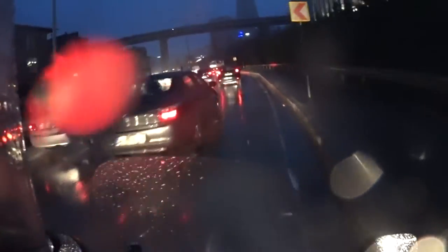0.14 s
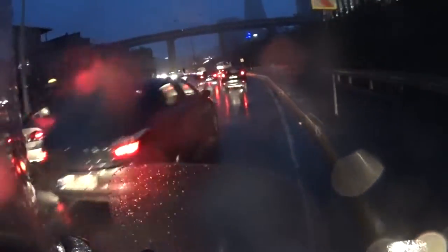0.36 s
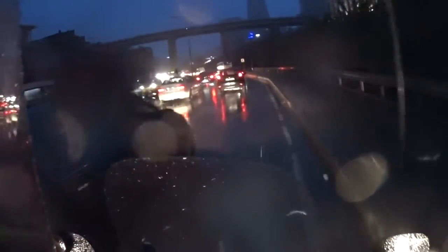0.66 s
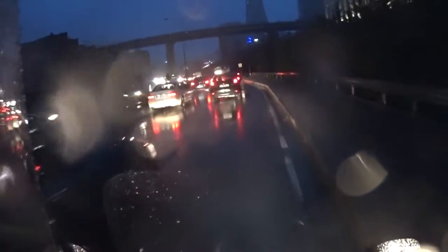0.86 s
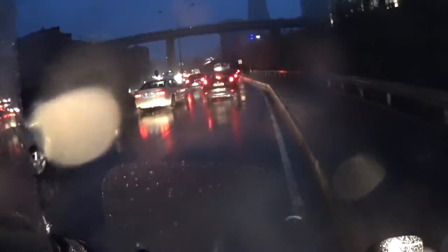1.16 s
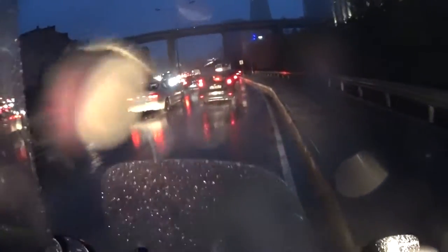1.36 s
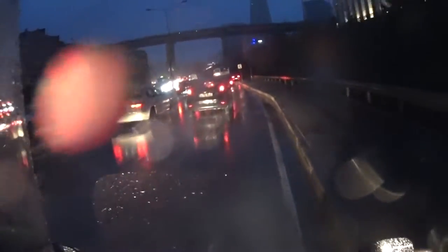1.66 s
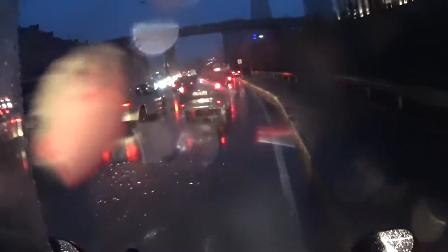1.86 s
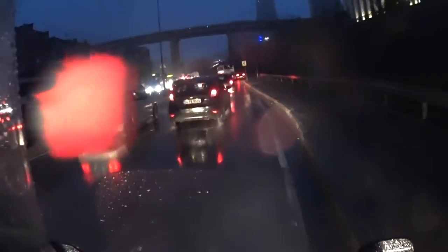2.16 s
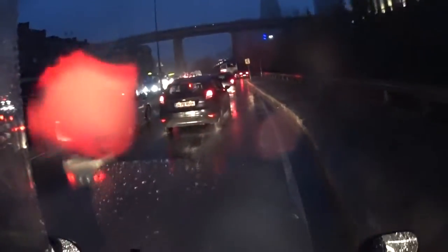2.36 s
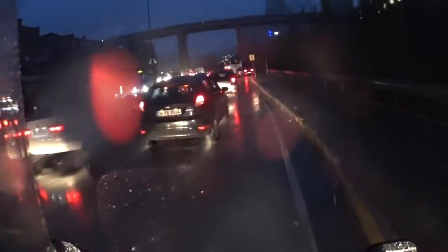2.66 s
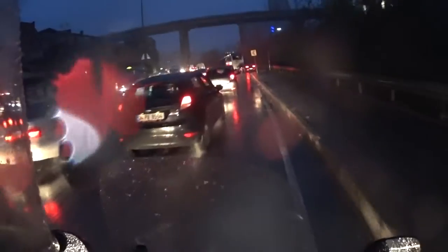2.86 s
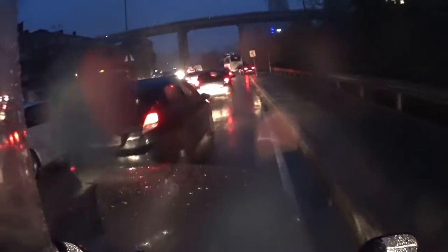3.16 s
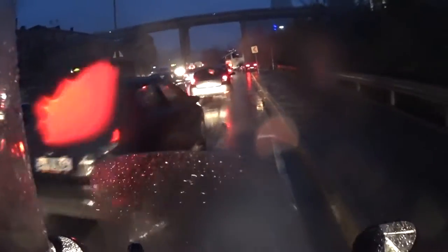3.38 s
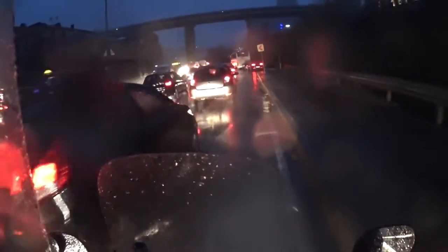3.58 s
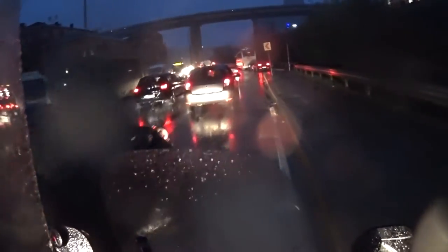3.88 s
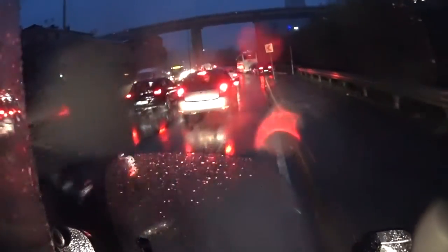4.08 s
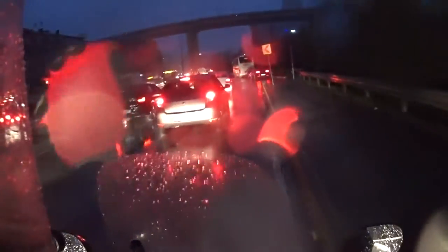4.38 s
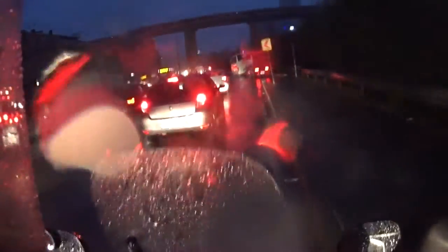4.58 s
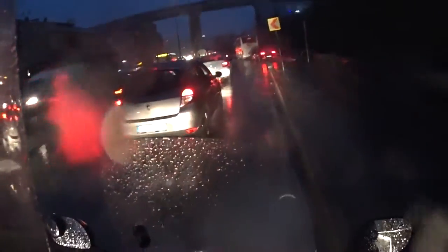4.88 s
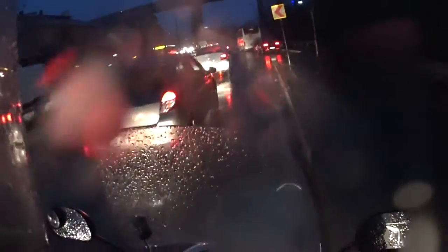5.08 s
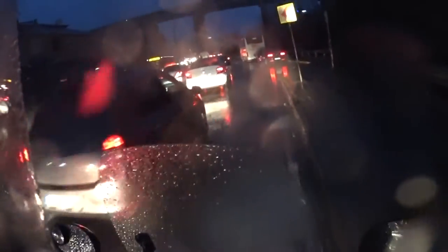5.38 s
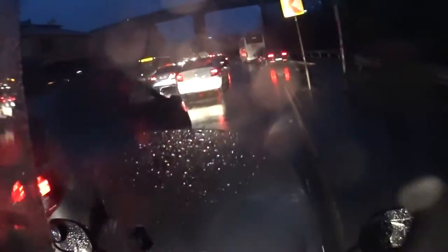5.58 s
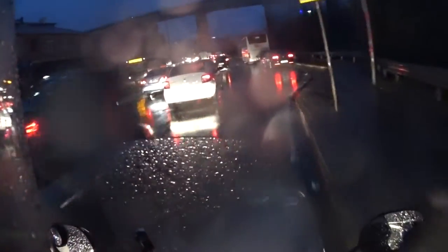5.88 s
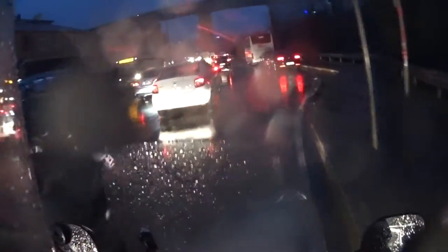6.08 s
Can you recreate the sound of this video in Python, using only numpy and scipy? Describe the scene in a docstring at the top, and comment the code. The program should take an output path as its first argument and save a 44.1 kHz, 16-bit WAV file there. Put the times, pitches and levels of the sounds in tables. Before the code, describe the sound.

Close to the microphone, rain raps on a thin plastic housing outdoors: sharp knocks, dull wet plinks, tiny ticks and bursts of patter, irregular and thick. Behind it runs the hissing, hollow wash of a wet road with a faint singing tone. After almost four seconds the big drops grow sparser and a weak engine hum emerges; the wash swells again near the end.

```python
"""Rain strikes the plastic housing of a camera on a scooter that rides along a wet road.
Drops fall thickly at first: large ones ring the housing, duller ones plink close by, specks tick, spray patters.
The road's wash passes the same shell, whose air cavity sings near 1 kHz; it swells near 0.9 s.
After about 3.7 s the large drops thin out and a faint engine hum rises below; the wash swells again near 6 s.
Struck modes make drops, specks and spray; short notes the plinks; shaped noise the wash; sines the hum."""
import sys
import numpy as np
from scipy import signal
from scipy.io import wavfile
from scipy.ndimage import uniform_filter1d

SR = 44100
rng = np.random.default_rng(int(sys.argv[2]) if len(sys.argv) > 2 else 0)


def store_pcm(level_fs):
    """Save levels as 16-bit WAV."""
    pcm = np.round(np.clip(level_fs, -1, 1) * 32767).astype(np.int16)
    wavfile.write(sys.argv[1], SR, np.atleast_2d(pcm).T)


N = 275184


def gain_of(db):
    """dB to amplitude gain."""
    return 10 ** (np.asarray(db) / 20)


def evened(x):
    """Scales to rms 1."""
    return x / np.sqrt(np.mean(x ** 2) + 1e-20)


def slow_noise(shape, size):
    """Noise of rms 1, smoothed twice over `size` samples."""
    smooth = uniform_filter1d(rng.standard_normal(shape), size=size)
    return evened(uniform_filter1d(smooth, size=size))


def read(points, hz):
    """Reads a spectrum on a log-frequency axis."""
    point_hz, value = np.transpose(points)
    return np.interp(np.log(hz + 1), np.log(point_hz + 1), value)


def place(times_s, hits):
    """Adds each stereo hit at its time."""
    out = np.zeros((2, N + SR))
    for time_s, hit in zip(times_s, hits):
        at = round(time_s * SR)
        out[:, at:at + hit.shape[1]] += hit
    return out[:, :N]


# engine: (time [s], firing rate [Hz], level [dB], boost of multiples above 2 [dB])
ENGINE = [(3.7, 182, -85, 0), (3.88, 183, -69.5, -1), (4.3, 189, -70.5, 3), (4.45, 189, -76, 4),
          (4.75, 190, -71, 0), (5.1, 184, -76, 4), (5.35, 183, -75, 7), (5.8, 187, -73, 3),
          (6.24, 199, -71, 1)]
# engine tones: (multiple of firing rate, relative level [dB])
ENGINE_ORDERS = [(2, 3), (3.1, 2.5), (4.02, -6)]


def hum(waver=0.009, flutter_db=2.5):
    """Sines at multiples of the firing rate waver together in pitch; each flutters in level."""
    time_s, firing_hz, level_db, upper_db = np.transpose(ENGINE)
    t = np.arange(N) / SR
    wobble, *flutters = slow_noise((1 + len(ENGINE_ORDERS), N), size=3000)
    turns = np.cumsum(np.interp(t, time_s, firing_hz) * (1 + waver * wobble)) / SR
    boost_db = np.interp(t, time_s, upper_db)
    tones = 0
    for (multiple, part_db), flutter in zip(ENGINE_ORDERS, flutters):
        tone_db = part_db + (multiple > 2) * boost_db + flutter_db * flutter
        tones = tones + gain_of(tone_db) * np.sin(2 * np.pi * (multiple * turns + rng.random()))
    return np.sqrt(2) * gain_of(np.interp(t, time_s, level_db)) * tones


# rain, also for spray and plinks: (time [s], road wash level [dB], shell spray level [dB], patter level [dB])
RAIN_LEVELS = [(0, -36.5, -49, -52), (.29, -39.5, -40.5, -62), (.5, -38.5, -48, -38.5),
               (.69, -37.5, -47, -51), (.92, -33.5, -43, -48), (1.1, -35, -47, -42.5),
               (1.2, -40, -49.5, -46), (1.65, -39.5, -43, -43), (1.78, -39, -43.5, -38.5),
               (1.95, -42, -44.5, -54), (2.15, -38.5, -43.5, -35.5), (2.28, -40.5, -45.5, -51),
               (2.45, -37, -40, -37.5), (2.62, -42.5, -48, -56), (2.87, -37.5, -44, -54),
               (3.1, -41, -52, -47.5), (3.5, -37.5, -53, -47.5), (3.8, -43.5, -47, -45),
               (4.03, -41, -55, -62), (4.55, -40, -51.5, -50), (5.0, -42.5, -49, -51.5),
               (5.65, -42.5, -54, -52.5), (5.9, -40.5, -59, -47), (6.05, -35.5, -53, -47),
               (6.24, -40, -45.5, -51)]
# road rumble: (time [s], level on the wash scale [dB])
RUMBLE_LEVELS = [(0, -36), (.8, -36.5), (1.2, -39.5), (1.6, -39.5), (1.9, -39), (2.35, -38), (2.52, -42.5),
                 (2.75, -44), (2.95, -38.5), (3.1, -44), (3.5, -42.5), (4.2, -46.5), (5.3, -46.5),
                 (6.24, -40)]
# wash heard through the housing: (frequency [Hz], relative density [dB per Hz])
WASH_SPECTRUM = [(30, -37), (368, -14), (500, -14), (880, -7.5), (1180, -13), (1550, -3), (2350, -9.5),
                 (2900, -7), (3600, -15), (3900, -17), (4500, -13.5), (4900, -19), (5600, -18.5),
                 (6900, -28), (9000, -33), (10800, -33.5), (14500, -47.5), (16500, -55)]
# left-right likeness of the wash: (frequency [Hz], correlation [-1 to 1])
WASH_LIKENESS = [(60, 0.87), (150, 0.99), (380, 0.91), (950, 0.93), (2380, 0.55), (5980, 0.68),
                 (15000, 0.27)]
# stereo lean of the wash: (frequency [Hz], left minus right [dB])
WASH_LEAN = [(60, 0.0), (150, 0.0), (380, 0.5), (950, 3.0), (2380, 0.5), (5980, -0.5), (15000, 0.0)]
CAVITY_HZ, CAVITY_WIDTH_HZ, CAVITY_DB = 1000, 66, 0.0  # air behind the ports


def wash(patchy_db=1.5, split_hz=1600.0):
    """Tyre wash and far rain as patchy noise through the cavity; rumble under the split swells on its own."""
    frames, hz = N // 512 + 5, np.fft.rfftfreq(2048, 1 / SR)
    a, b, c, d, patches = rng.standard_normal((frames, 1025, 5)).T
    patches = evened(uniform_filter1d(uniform_filter1d(patches, size=12, axis=0), size=5, axis=1))

    time_s, wash_db, *_ = np.transpose(RAIN_LEVELS)
    t = np.arange(frames) * 512 / SR
    low = 1 / (1 + (hz[:, None] / split_hz) ** 4)
    swell_db = low * np.interp(t, *np.transpose(RUMBLE_LEVELS)) + (1 - low) * np.interp(t, time_s, wash_db)

    same = np.clip(read(WASH_LIKENESS, hz), -1, 1)[:, None]
    lean = gain_of(read(WASH_LEAN, hz) / 2)[:, None]
    left, other = a + 1j * b, c + 1j * d
    right = same * left + np.sqrt(1 - same ** 2) * other
    stereo = np.array([lean * left, right / lean])

    # the cavity tone wavers at random in pitch and level
    drift, flutter = evened(uniform_filter1d(rng.standard_normal((2, frames)), size=5))
    offset_hz = hz[:, None] - CAVITY_HZ * (1 + .009 * drift)
    cavity = gain_of(CAVITY_DB + 2.5 * flutter) / (1 + (2 * offset_hz / CAVITY_WIDTH_HZ) ** 2)
    colour = gain_of(read(WASH_SPECTRUM, hz))[:, None] + cavity

    unit = np.sqrt(np.mean(signal.istft(left * colour, nperseg=2048, noverlap=1536)[1] ** 2))
    stereo = stereo * colour * gain_of(swell_db + patchy_db * patches) / unit
    return signal.istft(stereo, nperseg=2048, noverlap=1536)[1][:, :N]


# housing modes: (centre frequency [Hz], relative level before scatter [dB], t60 [s])
HOUSING_MODES = [(750, 13, 0.0059), (998.6, 5.5, 0.11), (1453, 22, 0.013), (1954, 12.5, 0.038),
                 (2295, -2, 0.016), (2656, 5.5, 0.0062), (2901, 3, 0.019), (3358, 6, 0.0094),
                 (3837, 2, 0.014), (4185, -4, 0.017), (5113, 4, 0.0032), (5500, 6.5, 0.0026),
                 (6270, -2.5, 0.0029), (7570, 0, 0.0014), (9070, -2.5, 0.00079), (10500, -13, 0.0049),
                 (12160, -16, 0.0011), (13300, -19, 0.0031), (15200, -26, .003)]
KNOCK, RING = HOUSING_MODES[:4], HOUSING_MODES[4:10]
SNAP, TICK = HOUSING_MODES[10:13], HOUSING_MODES[13:]
# shell, stiff below and sealed above: (edge [Hz], filter order, filter kind)
SHELL_FILTERS = [(700, 2, "highpass"), (11500, 3, "lowpass")]


def strikes(modes, count, splash_s, apart, tilt_db=0):
    """Stereo strikes (count, 2, time), mono rms 1 over 5 ms: a splash rings modes that differ by spot."""
    t = np.arange(900) / SR
    level_chance, pitch_chance = np.moveaxis(rng.standard_normal((count, len(modes), 2, 1)), 2, 0)
    hz, db, t60_s = np.array(modes).T[..., None]
    sign = (-1.) ** np.arange(len(modes))[:, None]
    mode_db = db + tilt_db * np.log2(hz / hz.mean()) + 3 * level_chance - 60 * t / t60_s
    rings = sign * gain_of(mode_db) * np.sin(2 * np.pi * hz * (1 + .035 * pitch_chance) * t)
    rings = rings.sum(1)
    # the last filter thins out what lies under the lowest mode
    for edge_hz, order, kind in SHELL_FILTERS + [(.8 * hz.min(), 2, "highpass")]:
        rings = signal.sosfilt(signal.butter(order, edge_hz, kind, fs=SR, output="sos"), rings)

    fade = np.exp(-t[:300] / splash_s)  # the water spreads after a sharp contact
    both, left, right = np.moveaxis(rng.standard_normal((count, 3, len(fade))) * fade, 1, 0)
    both = both + 5.04 * np.exp(-t[:300] / .00004)
    splash = np.stack([both + apart * left, both + apart * right], 1)  # the ports share part of the blow
    out = signal.fftconvolve(splash, rings[:, None], axes=2)
    return out * np.sqrt(SR / 200 / (out.mean(1) ** 2).sum(1))[:, None, None]


def rain_gain(column):
    """Gain over time from one level column of the rain table."""
    rain = np.transpose(RAIN_LEVELS)
    return gain_of(np.interp(np.arange(N) / SR, rain[0], rain[column]))


def random_drops(per_s, spread_db, most, gust_db, gust_size):
    """Impulses at random times, a few larger than most, their sizes swayed in short flurries."""
    size = gain_of(spread_db * np.minimum(rng.exponential(1, N), most)) * (rng.random(N) < per_s / SR)
    return size * gain_of(gust_db * slow_noise(N, gust_size))


def spray(per_s=800., spread_db=6.5, gust_db=7.5):
    """Small drops land at random on 24 spots and ring the housing modes."""
    spots = gain_of(-1.5) * strikes(KNOCK, count=24, splash_s=0.00095, apart=0.079)
    spots = spots + strikes(RING, count=24, splash_s=0.00072, apart=0.068)
    spots = spots + gain_of(-3.0) * strikes(SNAP + TICK, count=24, splash_s=0.0006, apart=1.2)
    size = random_drops(per_s, spread_db, 2.6, gust_db, gust_size=1500)
    spot = rng.integers(0, len(spots), N)
    out = 0
    for k, tap in enumerate(spots):
        out = out + signal.oaconvolve((size * (spot == k))[None], tap, axes=1)[:, :N]
    return evened(out) * rain_gain(column=2)


PATTER_RISE_S, CLEAR_RISE_S = 0.0022, 0.001117
PATTER_HZ, PATTER_SPREAD = 2272, 0.237  # median pitch and its log scatter
PLINK_SAG = 0.046  # fall in pitch, as a fraction


def plink(hz, rise_s=PATTER_RISE_S, rough=0.56, second_db=-7.0):
    """A soft, wet, uneven note: two tones of one pitch swell for rise_s, sag in pitch and die."""
    u = np.arange(600) / SR / rise_s
    turns = np.cumsum(hz * (1 + PLINK_SAG * (np.exp(-u / 2) - .5))) / SR
    wobble = 1 + rough * slow_noise(len(u), size=40)
    note = np.sin(2 * np.pi * (turns + rng.random()))
    note = note + gain_of(second_db) * np.sin(2 * np.pi * (turns + rng.random()))
    return np.sqrt(2) * u * np.exp(1 - u) * wobble * note


# dull drops on something soft close by: (time of peak [s], nominal rms level at peak [dB], pitch [Hz])
CLEAR_PLINKS = [(0.124, -33, 1870), (0.427, -32.5, 2240), (0.773, -37, 1880), (1.2501, -35, 2010),
                (1.2988, -29.5, 1800), (1.402, -25, 2070), (1.7158, -34, 1940), (1.81, -29, 2010),
                (2.1865, -32, 2370), (2.2688, -30, 2060), (2.5504, -34, 2190), (2.5785, -31, 2020),
                (2.6701, -35, 1930), (2.7651, -30, 2050), (2.8241, -28.5, 2230), (2.9423, -34, 1900),
                (3.1349, -36, 1980), (3.942, -32.5, 2030), (4.2472, -25, 2060), (4.529, -31, 1970),
                (4.562, -33, 2010), (4.7947, -34, 2040), (4.842, -34, 1960), (5.2733, -37.5, 2050),
                (5.6185, -25.5, 1880), (5.7994, -37, 1650), (5.818, -32, 1780), (6.1799, -32, 1950)]


def plinks(per_s=1300., spread_db=3.0, gust_db=2.2, lean_db=4.5):
    """Clear soft notes over a random patter of small ones from 16 spots, each leaning left or right."""
    size = random_drops(per_s, spread_db, 3, gust_db, gust_size=2000)
    spot, chance = rng.integers(0, 16, N), rng.standard_normal((16, 2))
    patter = 0
    for k, (pitch, side) in enumerate(chance):
        note = plink(PATTER_HZ * np.exp(PATTER_SPREAD * pitch))
        lean = gain_of(lean_db * side * np.array([[.5], [-.5]]))
        patter = patter + lean * signal.oaconvolve(size * (spot == k), note)[:N]
    out = evened(patter) * rain_gain(column=3)
    for peak_s, level_db, hz in CLEAR_PLINKS:
        part = out[:, round((peak_s - CLEAR_RISE_S) * SR):][:, :600]
        part += gain_of(level_db) * plink(hz, CLEAR_RISE_S)[:part.shape[1]]
    return out


# clear specks of spray: (time [s], peak level of the treble [dB])
SPRAY_SPECKS = [(.0167, -28), (.1017, -28), (.1164, -31), (.1384, -37), (0.159, -31), (0.2553, -30),
                (.3541, -35), (.38, -36), (.4044, -30), (.6367, -34), (.6586, -30), (.757, -35), (.77, -35),
                (.7866, -29), (.832, -39), (.8945, -34), (0.911, -32), (.9438, -28), (.961, -32),
                (1.0244, -38), (1.1093, -32), (1.191, -35), (1.235, -29), (1.343, -36), (1.4296, -35),
                (1.482, -30), (1.5723, -35), (1.6205, -27), (1.64, -33), (1.6665, -33), (1.699, -27),
                (1.795, -30), (1.844, -33), (2.0686, -30), (2.1435, -38), (2.1798, -33), (2.2388, -36),
                (2.289, -37), (2.4304, -37), (2.4384, -34), (2.4664, -36), (2.497, -30), (2.5047, -35),
                (2.524, -34), (2.5398, -37), (2.6191, -34), (2.796, -35), (2.814, -31), (2.858, -37),
                (2.9664, -31), (3.024, -35), (3.1397, -31), (3.213, -31), (3.32, -28), (3.329, -31),
                (3.401, -30), (3.4647, -29), (3.6004, -35), (3.9994, -32), (4.073, -30), (4.0978, -30),
                (4.103, -30), (4.441, -29.5), (4.4474, -31), (4.675, -34), (4.775, -32.5), (4.8513, -35),
                (5.023, -37.5), (5.2084, -30), (5.257, -30), (5.347, -36), (5.43, -34), (5.717, -31),
                (5.976, -32), (6.0072, -32), (6.0611, -30), (6.0973, -32), (6.161, -30)]


def specks(ring_db=0.0):
    """Each speck ticks the high modes and rings the middle ones; ring_db is ring over tick."""
    treble = strikes(SNAP + TICK, count=len(SPRAY_SPECKS), splash_s=0.0005, apart=1.0)
    ring = strikes(RING, count=len(SPRAY_SPECKS), splash_s=0.0019, apart=0.36)
    hits = treble + gain_of(ring_db) * ring
    time_s, level_db = np.transpose(SPRAY_SPECKS)
    treble_peak = abs(treble.mean(1)).max(1)
    return place(time_s, (gain_of(level_db) / treble_peak)[:, None, None] * hits)


# large drops, levels rms over 5 ms: (time [s], knock [dB], ring [dB], snap [dB], tick [dB])
LARGE_DROPS = [(0.0068, -34, -46, -52, -47), (0.0296, -49, -26.5, -32.5, -38), (0.0533, -35, -42, -35, -34),
               (0.1068, -36, -30, -30.5, -29), (0.2511, -36, -41, -39, -39), (0.2617, -36, -38, -38, -39.5),
               (0.2762, -37, -37, -44, -49), (0.33, -43, -37, -40, -39), (0.3996, -32.5, -23.5, -28, -37),
               (0.4387, -55, -41, -43, -47), (0.4764, -32, -30, -34, -42), (0.4895, -41, -28, -33, -47),
               (0.494, -47, -35, -36, -45), (0.497, -29, -22.5, -31, -33.5), (0.5601, -41, -28.5, -35, -43),
               (0.569, -50, -39, -42, -47), (0.5722, -31, -23.5, -29, -35), (0.5825, -33, -24, -27, -37),
               (0.6052, -39, -29, -32, -43), (0.627, -50, -47, -35, -41), (0.65, -56, -22.5, -29, -40),
               (0.683, -38, -30, -31, -30), (0.6887, -36, -31, -29, -40), (0.6988, -31, -27, -28, -48),
               (0.7016, -43, -42, -42, -39), (0.7404, -52, -35, -41, -39.5), (0.7947, -36, -25.5, -44, -40),
               (0.8054, -35, -33, -46, -42), (0.8215, -45, -47, -37, -44), (0.844, -33.5, -30, -36, -39),
               (0.8574, -49, -29.5, -43, -34.5), (0.8637, -38, -28.5, -32, -35),
               (0.8827, -30, -33, -29, -37), (0.9041, -28, -26, -26.5, -30.5), (0.916, -38, -32, -48, -42),
               (0.9223, -35, -28, -30.5, -48), (0.9772, -30.5, -29, -35, -42), (0.98, -45, -45, -34, -44),
               (0.9896, -40, -40, -35, -53), (0.9986, -51, -30, -30.5, -38), (1.0061, -32, -33, -41, -41),
               (1.043, -38, -43, -38, -47), (1.0468, -38, -34, -38, -50), (1.051, -41, -37, -35, -40.5),
               (1.0756, -39, -30, -39, -42), (1.0806, -37, -31, -33, -43), (1.0888, -37, -30, -33, -40),
               (1.2153, -54, -39, -37.5, -54), (1.227, -64, -29.5, -32, -55),
               (1.2783, -48, -34.5, -44, -45), (1.4637, -32, -30.5, -36, -49), (1.469, -43, -39, -38, -46),
               (1.476, -59, -32, -30, -32), (1.4883, -40.5, -41, -36, -42), (1.496, -53, -52, -38, -52),
               (1.5107, -46, -48, -38, -50), (1.5324, -40, -33, -49, -67), (1.5839, -42, -32.5, -43, -32),
               (1.6023, -36, -34.5, -44, -43), (1.7376, -31, -26.5, -30.5, -33),
               (1.7555, -29, -24.5, -30, -36), (1.783, -49, -50, -43, -53), (1.7886, -49, -33, -33, -49),
               (1.8008, -45, -32, -26.5, -47), (1.8064, -36, -35, -45, -46), (1.8536, -43, -43, -42, -45.5),
               (1.9194, -47, -26, -34, -48), (1.9306, -26.5, -23.5, -30, -36),
               (1.943, -25.5, -23.5, -32.5, -31.5), (2.027, -36, -36, -34.5, -49),
               (2.037, -53, -34, -35.5, -44), (2.0485, -42, -30.5, -46, -40),
               (2.1234, -27, -24.5, -26.5, -34), (2.1613, -36, -31, -28, -42),
               (2.1718, -38, -27, -32, -34.5), (2.2652, -41, -35.5, -48, -48),
               (2.3155, -34, -28.5, -30, -36), (2.3363, -25, -31, -28, -33.5), (2.342, -39, -31, -44, -44),
               (2.3496, -37, -25, -30, -44), (2.356, -36, -35, -25.5, -43), (2.373, -35, -22.5, -30, -35),
               (2.4084, -33, -31.5, -35, -40), (2.512, -34, -25, -50, -56),
               (2.516, -26.5, -24.5, -26, -31.5), (2.563, -36, -32, -36, -40),
               (2.624, -35, -26.5, -38, -41), (2.6478, -49, -39, -37, -52),
               (2.7221, -44, -30.5, -33.5, -40.5), (2.7782, -32, -33, -35, -46),
               (2.8266, -32, -28, -32, -34), (2.8334, -39, -22.5, -25.5, -44), (2.843, -57, -42, -37, -44),
               (2.8478, -55, -37, -35, -44), (2.87, -36, -30.5, -39, -40.5), (2.8797, -40, -35, -36, -52),
               (2.8864, -53, -33, -38, -54), (2.8912, -36, -30, -40, -51), (2.951, -38, -44, -37, -35),
               (2.9921, -42, -38, -39, -56), (2.997, -48, -29.5, -41, -41), (3.0104, -41, -40, -44, -63),
               (3.0144, -39, -32.5, -37, -41), (3.1862, -33, -24, -23, -38.5),
               (3.241, -25, -21.5, -32, -37), (3.261, -31, -30, -38, -44), (3.266, -36, -27.5, -25.5, -28),
               (3.338, -58, -39.5, -41, -59), (3.3466, -45, -39, -39, -47), (3.365, -37.5, -41, -47, -49),
               (3.372, -39, -35, -40, -52), (3.377, -55, -39, -44, -50), (3.4303, -35, -23, -28.5, -46),
               (3.44, -40, -37, -37, -52), (3.47, -25.5, -23.5, -23, -30), (3.488, -42, -38, -49, -51),
               (3.4972, -39, -40, -43, -53), (3.5086, -53, -33, -38, -44), (3.5164, -41, -31, -31, -50),
               (3.566, -44, -34.5, -30, -42), (3.569, -42, -37, -39, -41), (3.608, -53, -50, -39, -48),
               (3.6574, -41, -30, -25.5, -42), (3.6753, -42, -41, -41, -46), (3.6797, -41, -29, -29, -30),
               (3.69, -34, -35, -34, -50), (3.696, -46, -31, -32, -42), (3.7152, -34, -29, -28.5, -35),
               (3.7488, -35, -28, -43, -48), (3.8143, -38.5, -40, -36.5, -48),
               (3.8935, -42, -41.5, -38, -50), (3.9241, -43, -36.5, -30.5, -42),
               (3.9513, -45, -37, -35, -38.5), (4.0771, -41, -37.5, -42, -50), (4.2472, -34, -37, -59, -71),
               (4.267, -50, -27.5, -27, -36), (4.295, -37, -37, -40, -51), (4.31, -52, -39, -37.5, -40),
               (4.3346, -31, -27, -33, -42), (4.392, -42, -39, -46, -52), (4.4628, -33, -35, -37, -42),
               (4.4792, -32, -28, -37, -37), (4.519, -36, -30.5, -38, -47),
               (4.5688, -35.5, -33, -39.5, -52), (4.6023, -34, -30.5, -40, -39.5),
               (4.6811, -26.5, -28, -27.5, -31), (4.8661, -31.5, -32.5, -35, -47),
               (4.888, -40, -38, -41, -54), (4.8974, -46, -26.5, -33, -38), (4.9316, -27.5, -25, -34, -37),
               (5.055, -49, -36, -44, -48), (5.107, -56, -37.5, -47, -48), (5.1282, -73, -34.5, -45, -45),
               (5.1386, -39, -36, -35.5, -46), (5.171, -58, -39, -44, -53), (5.2013, -33.5, -32, -47, -49),
               (5.2251, -53, -32.5, -34, -46), (5.406, -51, -41, -42, -41), (5.416, -45, -36, -45, -51),
               (5.4526, -34.5, -31, -33, -41), (5.4989, -37, -39, -43, -45), (5.543, -39, -37, -39, -50),
               (5.6032, -55, -36, -41, -53), (5.6078, -40, -30, -37, -41), (5.623, -31, -33, -45, -47),
               (5.6506, -51, -36, -44, -40.5), (5.6568, -26, -23.5, -33, -43),
               (5.6739, -71, -26.5, -26, -54), (5.745, -42, -35.5, -50, -43.5), (5.749, -52, -40, -40, -55),
               (5.7763, -34, -33, -32.5, -38), (5.7901, -33, -33, -38, -43), (5.8066, -52, -38, -43, -54),
               (5.916, -36.5, -25.5, -27.5, -37), (6, -38, -32, -40, -51), (6.004, -41, -36, -28, -46),
               (6.021, -28, -25.5, -32, -42), (6.034, -36, -31, -44, -39), (6.0684, -35, -34, -32.5, -40),
               (6.0779, -44, -30.5, -30.5, -43), (6.1042, -38, -38, -48, -45),
               (6.116, -55, -35, -38.5, -45), (6.1277, -34, -31.5, -34.5, -44),
               (6.1455, -34.5, -34, -52, -59), (6.168, -52, -37, -35, -40), (6.172, -46, -36, -39, -50)]
RING_TILT = 0.42  # dB per octave for each dB of ring over knock: weaker knock, brighter ring


def large_drops():
    """Each large drop rings four groups of housing modes, each at its own level."""
    count = len(LARGE_DROPS)
    time_s, *levels_db = np.array(LARGE_DROPS).T[..., None, None]
    tilt_db = RING_TILT * (levels_db[1] - levels_db[0] - 16.0)
    knock_lean = gain_of([[1.], [-1.]])  # dB left, right
    groups = [knock_lean * strikes(KNOCK, count, splash_s=0.0013, apart=0.53),
              strikes(RING, count, splash_s=0.00082, apart=0.98, tilt_db=tilt_db),
              strikes(SNAP, count, splash_s=0.0014, apart=0.82),
              strikes(TICK, count, splash_s=0.00095, apart=1.0)]
    hits = sum(gain_of(db) * group for db, group in zip(levels_db, groups))
    return place(time_s.ravel(), hits)


def scene():
    """Drops and specks on the shell over plinks, spray, wash and hum."""
    return hum() + wash() + spray() + plinks() + specks() + large_drops()


HEADROOM = .65  # ceiling amplitude of the soft limit
EDGE_HZ = 16100


def record(dry):
    """The input stage rounds off the hardest hits; then a low-pass limits the band."""
    soft = HEADROOM * np.tanh(dry / HEADROOM)
    band_limit = signal.firwin(191, EDGE_HZ, window=("kaiser", 9), fs=SR)
    return signal.oaconvolve(soft, band_limit[None], "same")


dry = scene()
out = record(dry)
store_pcm(out)
```